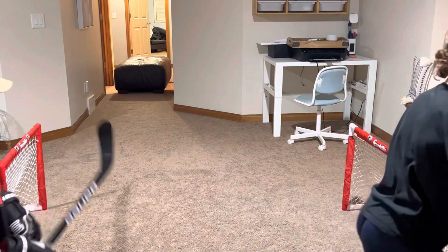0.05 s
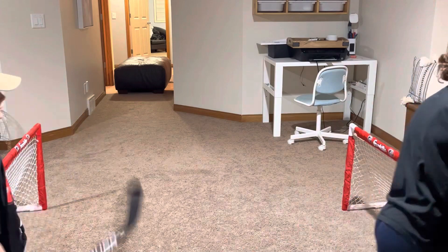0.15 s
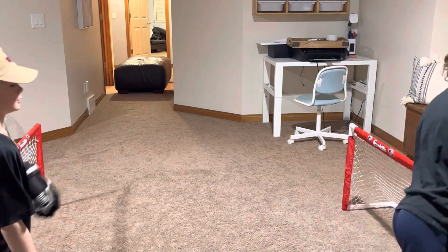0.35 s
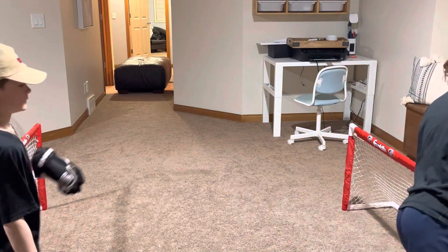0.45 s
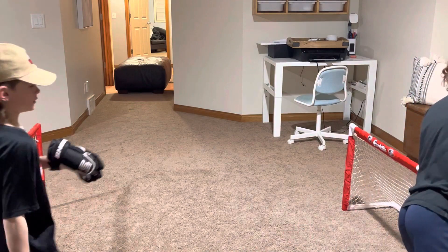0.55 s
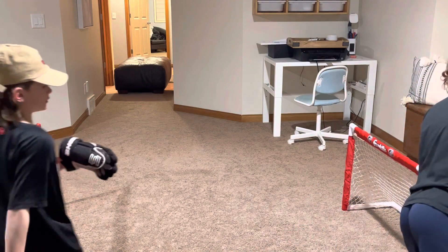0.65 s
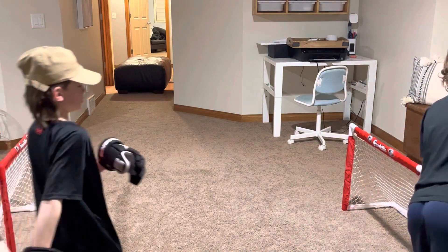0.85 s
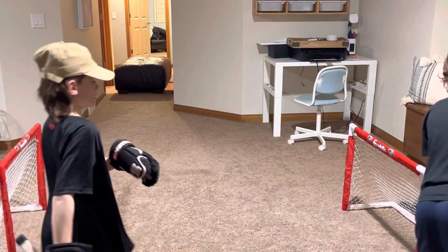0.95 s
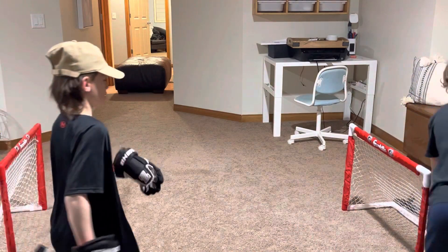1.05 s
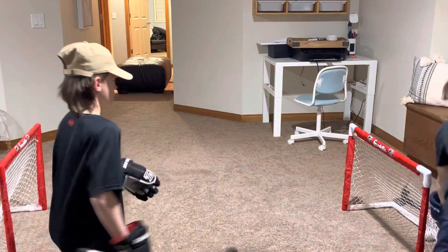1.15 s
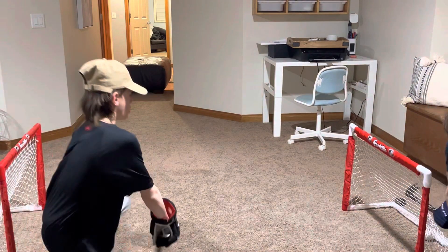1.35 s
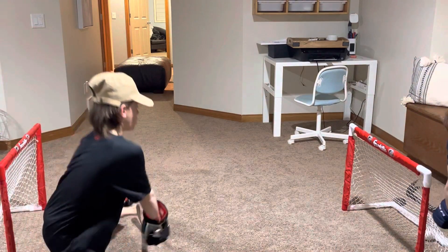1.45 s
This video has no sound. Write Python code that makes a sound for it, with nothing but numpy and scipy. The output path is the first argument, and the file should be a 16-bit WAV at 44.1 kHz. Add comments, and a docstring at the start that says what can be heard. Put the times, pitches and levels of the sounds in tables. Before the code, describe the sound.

One heavy footstep thuds on carpet and booms briefly in a small room. Lighter steps come before and after it, while clothes and feet rub softly near the microphone over a low room rumble.

```python
"""One heavy step lands on the carpeted floor of a playroom, with children shuffling near the microphone.
The heel taps and crushes the pile; heel, sole and body weight push the floor, which booms briefly
into the small room, and jolted gear rings faintly. Lighter steps thud before and after it.
Clothes and feet rub softly throughout, over a low room rumble and hum."""
import sys
import numpy as np
from scipy import signal
from scipy.fft import rfft, irfft, next_fast_len
from scipy.io import wavfile

SR = 44100
rng = np.random.default_rng(int(sys.argv[2]) if len(sys.argv) > 2 else 0)


def file_out(sig):
    """Save sig as 16-bit WAV at sys.argv[1]."""
    # one column per channel
    cols = np.atleast_2d(sig).T
    # limit, then scale
    lim = np.clip(cols, -1, 1)
    pcm = np.round(lim * 32767).astype(np.int16)
    wavfile.write(sys.argv[1], SR, pcm)


N = 66150
T = np.arange(N) / SR

# Rumble of the room air: frequency_hz, relative_db
AIR_SPECTRUM = [(20, -22.5), (38, 3), (65, 8), (90, -5.5), (180, -7), (280, -18), (400, -15), (700, -21),
                (1500, -28.5), (2400, -32), (4000, -53.5), (6500, -58.5), (8000, -46), (11000, -76),
                (15000, -97)]
# Steady room hum: pitch_hz, level_db
HUM_TONES = [(120, -63.5), (381, -72.5)]
# Tone of the room's reflections: frequency_hz, gain_db
ECHO_SPECTRUM = [(40, -24.5), (90, -19), (200, -13.5), (400, -6), (1000, -8), (8000, -8)]
# Rise and fall of the clothes' rubbing: time_s, relative_db
CLOTH_LEVELS = [(0, -66.5), (.09, -79), (.21, -67), (.3, -65.5), (.39, -65), (.45, -67.5), (.56, -70.5),
                (.69, -71), (.77, -79), (.85, -82), (.93, -73), (1.01, -65.5), (1.12, -68), (1.19, -62.5),
                (1.25, -60.5), (1.33, -73), (1.405, -72.5), (1.425, -66.5), (1.5, -62)]
# Sleeves swishing, soles brushing, soles dragging: start_s, length_s, level_db
SLEEVE_SWISHES = [(.47, 0.14, -78.5), (1.0, 0.27, -69), (1.12, 0.26, -68)]
SOLE_SCUFFS = [(.355, 0.055, -78), (0.44, 0.25, -75.5), (1.21, 0.15, -73.5), (1.412, 0.049, -74)]
SOLE_DRAGS = [(0, 0.28, -64), (.95, 0.19, -69), (1.19, 0.13, -58), (1.33, .14, -65), (1.43, 0.17, -54)]
# Tone of each kind of friction: frequency_hz, relative_db
CLOTH_SPECTRUM = [(300, 9), (600, -2.5), (1000, -3.5), (1200, 4.5), (1500, 7), (1900, 3), (2800, -3),
                  (3800, -3.5), (5000, -10.5), (6800, -26), (8500, -20), (12000, -28.5), (15000, -30.5)]
SLEEVE_SPECTRUM = [(1500, -27), (2400, -3.5), (3500, 5.5), (4300, -4), (5500, -13), (7000, -17),
                   (8500, -16), (12000, -26), (15000, -25)]
SCUFF_SPECTRUM = [(1000, -12), (3000, -0.5), (4800, 16), (6800, -2.5), (8500, 5.5), (12000, -7.5),
                  (15000, -8)]
DRAG_SPECTRUM = [(150, -4.5), (300, 1.5), (550, 2), (950, -0.5), (1300, -10), (3000, -38)]
# Resonances of floor and room: pitch_hz, relative_db, t60_s, rise_s
FLOOR_RESONANCES = [(70.14, -13, 0.12, 0.032), (98, -14, .15, .042), (117, -24.5, 0.24, .038),
                    (153, -17, .26, 0.0061), (180.2, -22, 0.15, 0.073), (202.07, -14.5, 0.27, 0.029),
                    (220.2, -15, 0.12, .002), (263, -20, .25, 0.037), (284.5, -15.5, 0.064, .037),
                    (314, -34, 0.11, .015), (347.2, -25, .23, .002), (395, -31, 0.082, 0.014),
                    (454, -28.5, 0.12, 0.0013)]
# Light steps and shifts of weight: start_s, impulse_db, contact_ms
LIGHT_CONTACTS = [(.092, -14, 19.2), (.131, -16.5, 13.6), (.156, -6.5, 16), (.476, -25.5, 6.7),
                  (.79, -14.5, 18), (1.194, -29.5, 4.5), (1.219, -18.5, 6.5), (1.241, -21.5, 5),
                  (1.274, -17, 7.4), (1.318, -21, 6.7), (1.423, -28, 2), (1.449, -17.5, 8.1),
                  (1.484, -16, 9.26)]
# Ring of the jolted gear: pitch_hz, level_db, t60_s
GEAR_MODES = [(3940, -64.5, 0.2), (4120, -66.5, .08)]
# The heel's first touch, then its dull slap on the pile: frequency_hz, relative_db
TAP_SPECTRUM = [(250, -21), (450, 10), (650, 5.5), (780, 0), (930, 3.5), (1250, -19.5), (2200, -26),
                (5000, -27), (7000, -39), (11000, -41.5), (15000, -49)]
SLAP_SPECTRUM = [(125, -7), (200, -4.5), (320, 3), (400, 0), (600, -2), (750, -17.5), (1000, -20),
                 (1250, -32.5), (2000, -30), (4000, -44.5), (6500, -52.5), (10000, -55), (15000, -60)]
# The heavy step, contact by contact: start_s, impulse_db, contact_ms
HEAVY_CONTACTS = [(.2358, 1.5, 2.97), (.2534, -6.5, 2.55), (.2698, -13, 2.3), (.3265, -20, 1.45)]

LANDING_S = .2345
SIDE_SIGNS = np.array([[1], [-1]])  # left, right


def undb(db):
    """Decibels to gain."""
    return 10 ** (np.asarray(db) / 20)


def unit_rms(x):
    """Scale to rms 1."""
    return x / np.sqrt(np.mean(x ** 2))


def pan(left_db):
    """Stereo gains with the left side louder by left_db."""
    return undb(SIDE_SIGNS * left_db / 2)


def colour(x, spectrum):
    """Causal, minimum-phase filter through (frequency_hz, gain_db) points."""
    size = next_fast_len(2 * N)
    hz, db = np.array(spectrum).T
    bins_hz = np.arange(size // 2 + 1) * SR / size
    gain = undb(np.interp(np.log(bins_hz + 1), np.log(hz), db))
    cepstrum = irfft(np.log(gain), size)
    cepstrum[1:size // 2] *= 2
    cepstrum[size // 2 + 1:] = 0
    return irfft(rfft(x, size) * np.exp(rfft(cepstrum)), size)[..., :N]


def band(x, hz, kind):
    """Gentle low-, high- or band-pass."""
    return signal.sosfilt(signal.butter(2, hz, kind, fs=SR, output="sos"), x)


def noise(width):
    """Stereo noise; width is the side's share against the middle."""
    mid, side = rng.standard_normal((2, N))
    return mid + width * side * SIDE_SIGNS


def fade(age_s, t60_s):
    """An exponential fall of 60 dB every t60_s."""
    return np.exp(-np.log(1000) * age_s / t60_s)


def burst(start_s, attack_s, decay_s):
    """A quick rise and an exponential fall."""
    age = np.maximum(T - start_s, 0)
    return np.minimum(age / attack_s, 1) * np.exp(-age / decay_s)


def swell(start_s, length_s):
    """A smooth rise and fall."""
    return np.sin(np.pi * np.clip((T - start_s) / length_s, 0, 1)) ** 2


def room_tone():
    """Low rumble, alike on both sides of the microphone in the bass, with a faint hum."""
    mid, side = rng.standard_normal((2, N))
    air = mid + .53 * band(side, hz=396, kind="highpass") * SIDE_SIGNS
    rumble = band(colour(air, AIR_SPECTRUM), hz=22, kind="highpass")
    hum = sum(undb(db) * np.sqrt(2) * np.sin(2 * np.pi * (hz * T + rng.random())) for hz, db in HUM_TONES)
    return undb(-53.5) * unit_rms(rumble) * pan(left_db=1) + hum


def room_echo(x, delay_s=.024, split_hz=460, bass_t60_s=.12, treble_t60_s=.55):
    """Diffuse reflections of a small furnished room; the bass dies first."""
    age = np.maximum(T - delay_s, 0)
    response = 0
    for kind, t60_s, width in (("lowpass", bass_t60_s, .93), ("highpass", treble_t60_s, .66)):
        tail = noise(width) * (age > 0) * fade(age, t60_s)
        response += band(unit_rms(tail) / np.sqrt(N), split_hz, kind)
    return signal.fftconvolve(x, colour(response, ECHO_SPECTRUM), axes=1)[:, :N]


def fibres(spectrum, spread_db=4):
    """Countless fibres catch and slip, each with its own strength."""
    slips = noise(width=.47) * undb(spread_db * rng.standard_normal(N))
    return unit_rms(colour(slips, spectrum))


def strokes(movements, spectrum):
    """Short rubbing movements that swell and fade."""
    return fibres(spectrum) * sum(undb(db) * swell(start, length) for start, length, db in movements)


def shuffling(flicker_db=1):
    """Near the microphone, clothes rub, sleeves swish, soles brush and drag with uneven friction."""
    flicker = unit_rms(band(rng.standard_normal(N), hz=43, kind="lowpass"))
    cloth_db = np.interp(T, *np.array(CLOTH_LEVELS).T) + 3.5
    cloth = fibres(CLOTH_SPECTRUM) * undb(cloth_db) * pan(left_db=1.4)
    sleeves = strokes(SLEEVE_SWISHES, SLEEVE_SPECTRUM)
    soles = strokes(SOLE_SCUFFS, SCUFF_SPECTRUM) + strokes(SOLE_DRAGS, DRAG_SPECTRUM)
    return undb(flicker_db * flicker) * (cloth + sleeves + soles)


def foot_force(contacts):
    """Each contact is a cushioned push on the floor, duller the longer it lasts."""
    force = 0
    for start_s, impulse_db, contact_ms in contacts:
        push = swell(start_s, contact_ms / 1000)
        force += undb(impulse_db) * push / push.sum()
    return force


def floor_boom(force):
    """Pushed modes of floor and room, alternating in sign, build up and die away."""
    ring = 0
    for k, (hz, db, t60_s, rise_s) in enumerate(FLOOR_RESONANCES):
        build_up = 1 - np.exp(-(T / rise_s) ** 3)
        envelope = build_up * fade(np.maximum(T - rise_s, 0), t60_s)
        ring += (-1) ** k * undb(db) * envelope * np.sin(2 * np.pi * hz * T)
    return signal.fftconvolve(force, ring)[:N]


def light_steps(pad_hz=79, half_band_octaves=.59):
    """Soft footfalls: a dead thud in the carpet pad, with some ring from the floor."""
    force = foot_force(LIGHT_CONTACTS)
    edge_ratio = 2 ** half_band_octaves
    thud = band(force, [pad_hz / edge_ratio, pad_hz * edge_ratio], "bandpass") * SR / pad_hz
    return undb(-17.5) * thud + undb(-4) * floor_boom(force)


def gear_tick():
    """A small hard piece of gear, jolted by the landing, rings faintly."""
    age = np.maximum(T - LANDING_S, 0)
    return sum(undb(db) * np.sin(2 * np.pi * hz * age) * fade(age, t60) for hz, db, t60 in GEAR_MODES)


def heel_slap():
    """The heel taps the carpet just left of centre, then crushes the pile in a short dull burst."""
    crush = unit_rms(colour(noise(width=.56), SLAP_SPECTRUM))
    crush *= undb(-25.5) * burst(LANDING_S, attack_s=.0026, decay_s=.034)
    tap = unit_rms(colour(noise(width=.5), TAP_SPECTRUM))
    tap *= undb(-32) * burst(start_s=.234, attack_s=.0023, decay_s=.0047)
    return (tap + crush) * pan(left_db=2)


def heavy_step():
    """Heel, sole and body weight set the floor booming, with a slap and a tick on landing."""
    return floor_boom(foot_force(HEAVY_CONTACTS)) + heel_slap() + gear_tick()


def scene():
    """Footfalls and shuffling reach the microphone directly and as echo, over the room tone."""
    feet = heavy_step() + light_steps()
    rubbing = shuffling()
    return feet + rubbing + room_echo(feet + undb(-.5) * rubbing) + room_tone()


def record(dry, cutoff_hz=15700):
    """The recorder cuts the top treble steeply."""
    return signal.sosfilt(signal.ellip(8, .2, 70, cutoff_hz, fs=SR, output="sos"), dry)


dry = scene()
out = record(dry)
file_out(out)
```